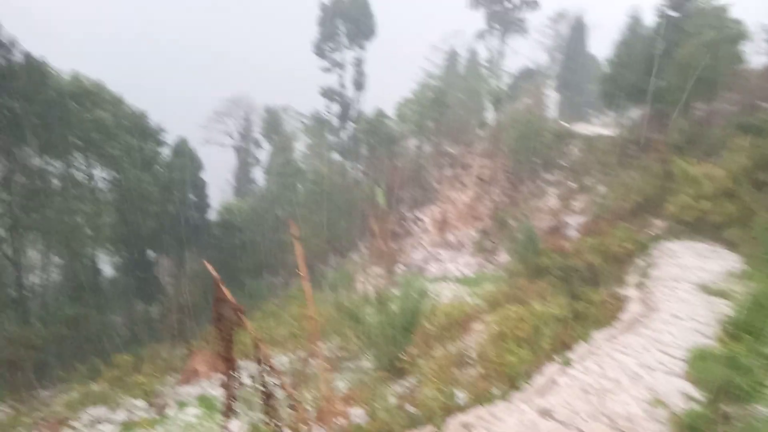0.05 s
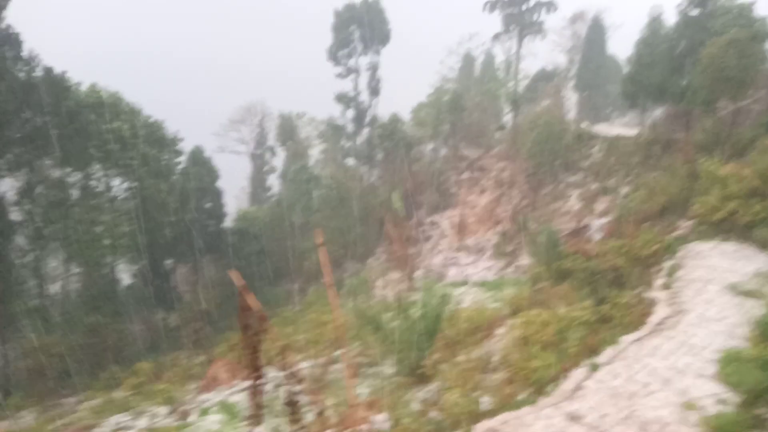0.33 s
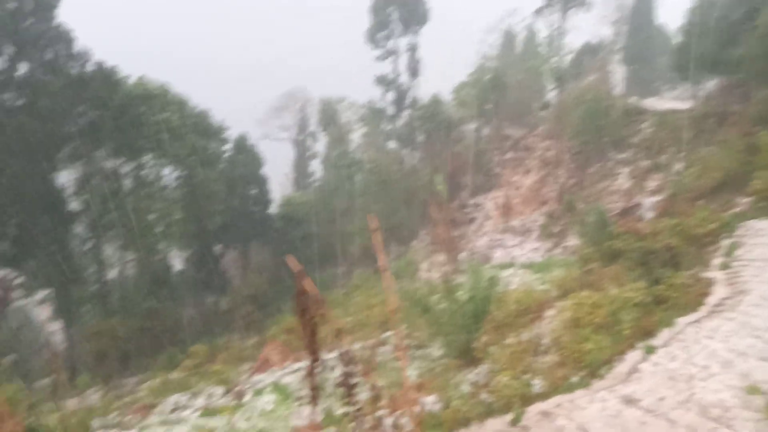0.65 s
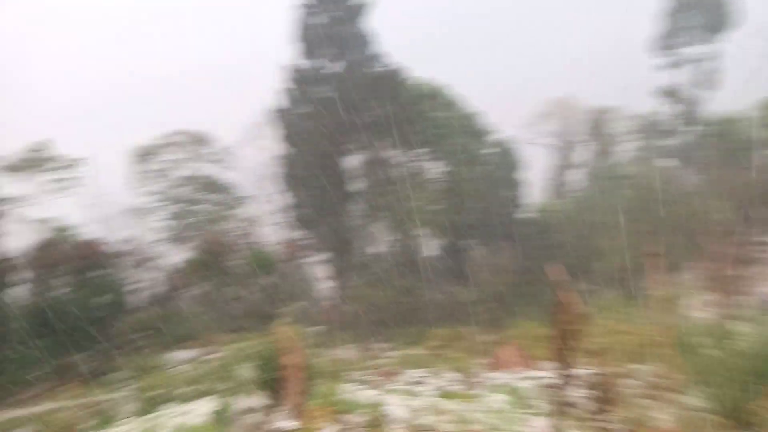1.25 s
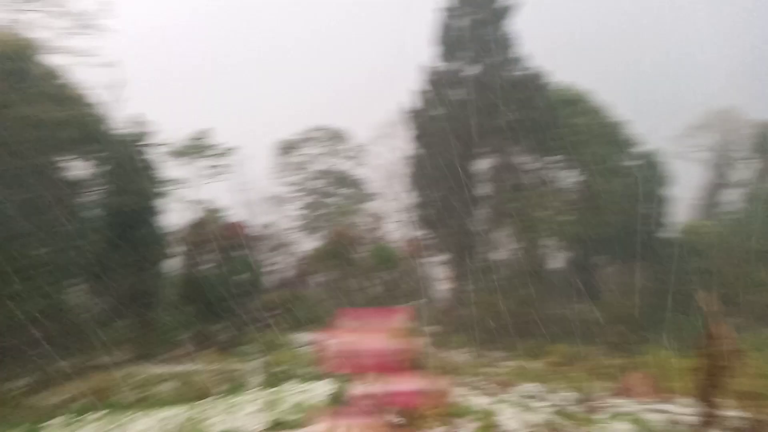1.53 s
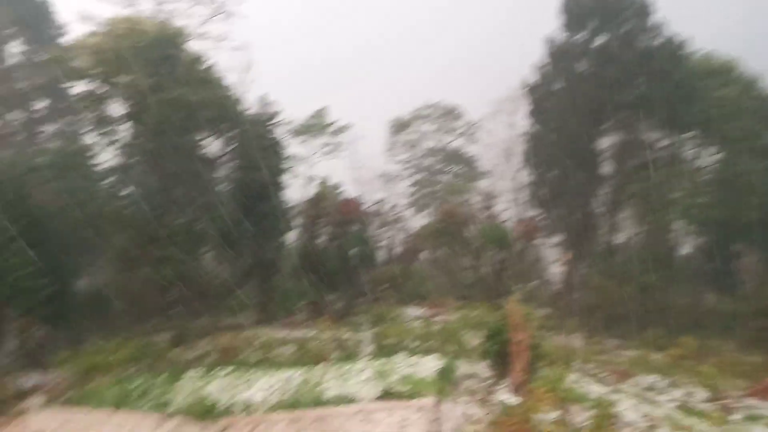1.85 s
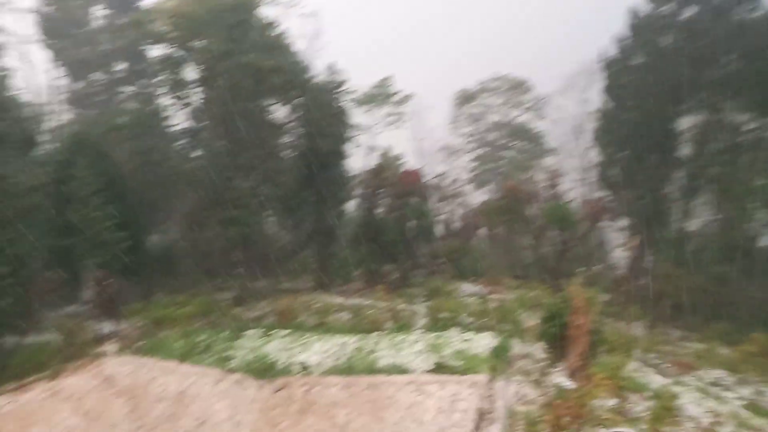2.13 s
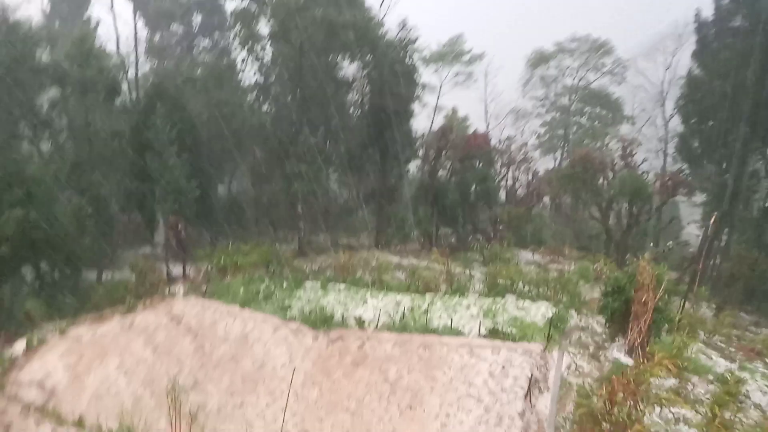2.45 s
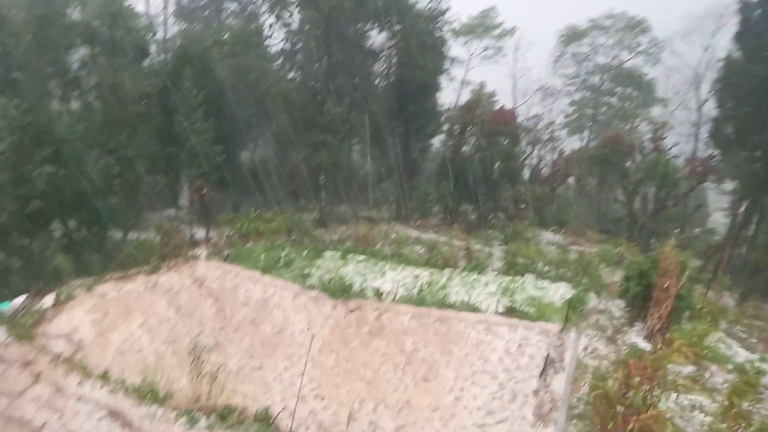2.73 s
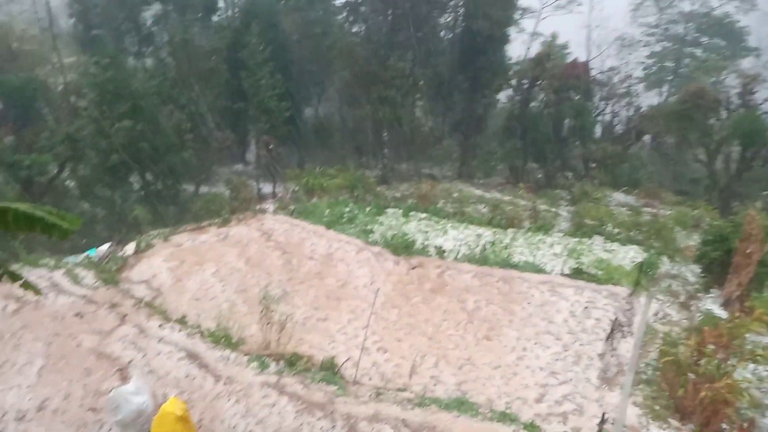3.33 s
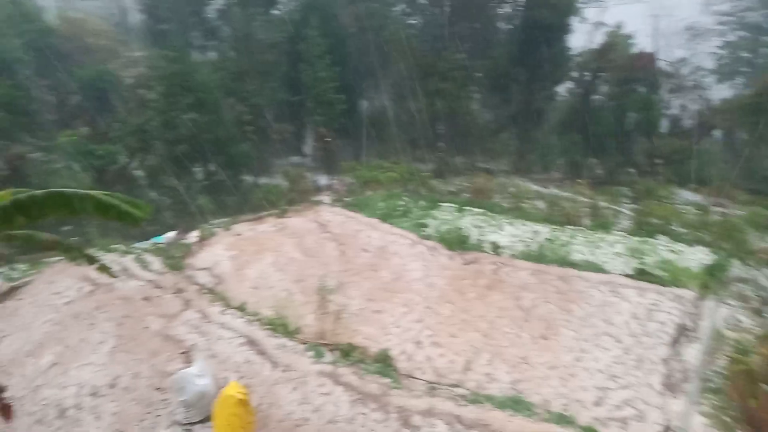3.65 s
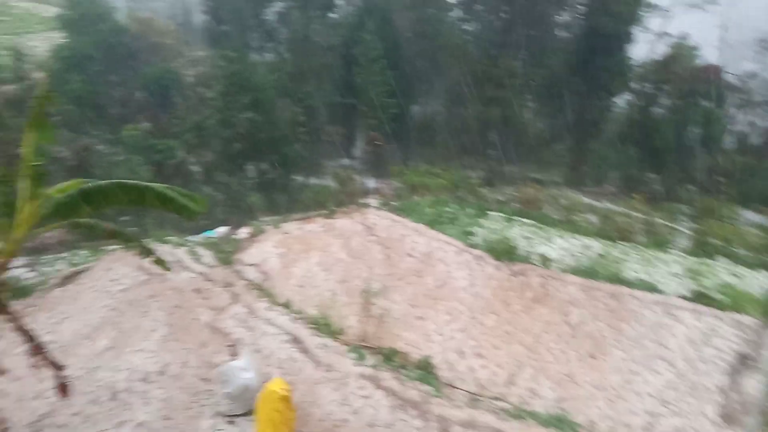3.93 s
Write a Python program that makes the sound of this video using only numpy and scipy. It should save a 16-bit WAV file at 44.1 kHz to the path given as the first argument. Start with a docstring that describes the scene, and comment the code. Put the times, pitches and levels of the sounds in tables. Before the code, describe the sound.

A hailstorm makes a dense roar and patter, with rapid, irregular knocks on roof sheets near the microphone and small icy ticks on the ground. Later the roar softens slightly as sharper blows stand out and a panel occasionally booms.

```python
"""Heavy hail outdoors, heard from beside a roof. From the start, countless far stones merge into a roar,
nearer ones patter, pellets tick on hard ground, and the biggest crack on the roofing: a short knock,
a rattle of the sheet, a dull answer from its frame. Early on, a few leave a loose sheet ringing;
from 1.5 s, heavy ones set a panel booming. After 2 s the roar eases back and the hardest blows land,
caught by a limiter."""
import sys
import numpy as np
from scipy import signal
from scipy.fft import rfft, irfft, next_fast_len
from scipy.io import wavfile
from scipy.ndimage import uniform_filter1d, minimum_filter1d, map_coordinates

SR = 44100
rng = np.random.default_rng(int(sys.argv[2]) if len(sys.argv) > 2 else 0)


def transcribe(u):
    """Save the signal u as a 16-bit wav file named by the first command-line argument.

    u: samples, shape (n,) or (channels, n), limited to [-1, 1]; the rate is SR.
    q: integer samples, one column per channel.
    """
    v = np.clip(np.atleast_2d(u).T, -1, 1)
    q = np.round(v * 32767).astype(np.int16)
    wavfile.write(sys.argv[1], SR, q)


N = 176400

# big stones on the roof: t/s, knock level/dB, knock f/Hz, rattle level/dB, bright rattle level/dB,
# frame level/dB, rattle t60/s
BIG_STONES = [(0.0034, -1, 2190, -18, -12.5, -24, 0.068), (0.0685, -11, 1910, -29, -18.5, -19, 0.21),
              (0.164, -11, 2300, -22, -19, -14, 0.28), (0.232, 1, 2140, -16.5, -21.5, -17, 0.3),
              (0.2852, -7, 1890, -18, -19, -23, 0.093), (0.414, -4, 3340, -15, -15, -17, 0.14),
              (0.4904, 0, 1710, -13, -23, -28, 0.062), (0.5745, -1.5, 1600, -16, -18.5, -19, 0.14),
              (0.7027, -2.5, 1870, -24, -20, -31, 0.07), (0.7345, -3, 1800, -23, -17, -42, 0.086),
              (0.944, -5, 1530, -28, -16, -15, 0.14), (1.0107, -8, 1740, -13, -14.5, -24, 0.16),
              (1.0281, 2.5, 1720, -11.5, -12.5, -32, 0.083), (1.0695, 0, 1590, -9, -13, -26, 0.1),
              (1.0947, 0, 1720, -14, -19, -19, 0.11), (1.128, -1, 1610, -13, -16, -34, 0.11),
              (1.1465, -4, 2270, -11, -20, -39, 0.06), (1.183, -4, 3280, -20, -13.5, -22, 0.12),
              (1.236, -1, 2000, -16, -18, -16.5, 0.096), (1.3503, -10, 1620, -18, -17, -20, 0.1),
              (1.425, -10, 2380, -17.5, -16.5, -18, 0.13), (1.4514, -7, 2560, -12, -10, -15, 0.084),
              (1.4946, -6, 1910, -7.5, -15, -16, 0.11), (1.512, 1, 1900, -12.5, -24, -18, 0.18),
              (1.536, -2, 2310, -6.5, -12, -17, 0.098), (1.598, -1, 3290, -14, -8.5, -44, 0.047),
              (1.702, -5, 2520, -8, -18, -18, 0.093), (1.779, 4, 1730, -12.5, -25, -26, 0.16),
              (1.8482, -5, 2030, -11.5, -12.5, -44, 0.11), (1.866, -2, 1890, -14, -23, -15, 0.21),
              (1.914, -9, 1980, -12, -14.5, -16, 0.077), (1.943, -1, 1930, -7, -13.5, -29, 0.09),
              (1.975, 0.5, 1810, -15, -19, -39, 0.098), (2.0547, -5, 1810, -11, -39, -17.5, 0.07),
              (2.0857, -5, 2540, -11, -19.5, -13, 0.28), (2.1321, 3.5, 1840, -9, -21, -14, 0.11),
              (2.1667, 1.5, 1700, -16, -17.5, -40, 0.065), (2.1991, 6, 2360, -10.5, -13.5, -28, 0.095),
              (2.2488, 6, 2320, -14.5, -18, -20, 0.13), (2.269, 2, 1840, -17, -22, -22, 0.28),
              (2.3516, 13, 2150, -13.5, -20.5, -20, 0.16), (2.4624, -1.5, 1480, -7, -18.5, -42, 0.057),
              (2.4998, 2, 1890, -15, -24, -20, 0.16), (2.5588, -5, 2260, -20, -20.5, -24, 0.27),
              (2.604, -0.5, 2120, -12, -23, -19.5, 0.098), (2.6508, -3, 2240, -6.5, -26, -20.5, 0.07),
              (2.785, -9, 2070, -10, -30, -22, 0.05), (2.8002, 6, 2350, -12.5, -25, -19.5, 0.22),
              (2.8894, -0.5, 2010, -14.5, -14, -15.5, 0.095), (2.923, -4, 1560, -16, -29, -24, 0.11),
              (2.988, -1, 2180, -12.5, -27, -19, 0.14), (3.0194, -2, 1800, -7, -10, -17, 0.064),
              (3.0703, -3, 2440, -18, -36, -37, 0.043), (3.0917, 6, 2350, -14, -23, -22.5, 0.16),
              (3.1283, -3, 2040, -10, -16, -20.5, 0.081), (3.1637, -4, 2180, -18, -19, -27, 0.13),
              (3.1815, -0.5, 1730, -10, -18, -20.5, 0.11), (3.2262, -2, 2040, -9.5, -12.5, -18, 0.12),
              (3.3053, 4, 2210, -18, -29, -43, 0.24), (3.3337, -6, 2150, -11, -16, -24, 0.08),
              (3.3924, 8, 2170, -8, -16, -18, 0.078), (3.429, -8, 1930, -13.5, -21.5, -17, 0.13),
              (3.472, -8.5, 2150, -26, -22, -35, 0.082), (3.5087, -7.5, 2250, -12, -27, -24, 0.13),
              (3.523, -3.5, 2000, -12.5, -18.5, -21.5, 0.12), (3.5518, -6.5, 2310, -15.5, -17, -25, 0.13),
              (3.6162, 1, 2140, -12, -15, -20, 0.068), (3.6538, 0.5, 2405, -11, -16, -25, 0.08),
              (3.677, -4, 2250, -11, -19.5, -18.5, 0.1), (3.743, -11.5, 1840, -16, -23, -19.5, 0.093),
              (3.824, -5, 2480, -12, -11.5, -18, 0.11), (3.8788, -9, 1890, -13.5, -19, -19, 0.17),
              (3.954, -5, 2500, -10.5, -25, -26, 0.07), (3.9815, -5, 1980, -3, -16, -22.5, 0.048)]
# tone colour of hail clattering on roofs: f/Hz, level/dB
CLATTER_COLOUR = [(500, -21), (1100, -6.5), (1850, 1), (2900, -4.5), (3800, -3.5), (4400, -11.5),
                  (5500, -27.5), (8000, -54)]


def amp(db):
    """Decibels to gain."""
    return 10 ** (np.asarray(db) / 20)


def unit(x):
    """Scale to rms 1."""
    return x / np.sqrt(np.mean(x ** 2) + 1e-20)


def wobble(knots_per_s):
    """A smooth random curve."""
    return map_coordinates(rng.standard_normal(4096), [np.arange(N) * knots_per_s / SR], mode="wrap")


def coloured(x, colour):
    """x through a causal EQ curve (f/Hz, level/dB), at rms 1."""
    size = 2 * next_fast_len(len(x) // 2 + 2048)
    hz, db = np.transpose(colour)
    curve_db = np.interp(np.log(np.fft.rfftfreq(size, 1 / SR) + 1), np.log(hz), db)
    cepstrum = irfft(np.log(amp(curve_db)))
    cepstrum[1:size // 2] *= 2  # minimum phase: nothing rings ahead of an attack
    cepstrum[size // 2 + 1:] = 0
    response = np.exp(rfft(cepstrum))
    return unit(irfft(rfft(x, size) * response)[:len(x)])


def noise(colour):
    """Fresh noise of the given colour."""
    return coloured(rng.standard_normal(N), colour)


def click(colour):
    """One impulse of the given colour, shifted a little in pitch, with peak 1."""
    shift = np.exp(0.11 * rng.standard_normal())
    pulse = coloured(signal.unit_impulse(SR // 100), np.array(colour) * [shift, 1])
    return pulse / np.abs(pulse).max()


def fade(t, rise_s, t60_s):
    """Quick attack, exponential decay."""
    return (1 - np.exp(-t / rise_s)) * amp(-60 * t / t60_s)


def sines(hz, db, t):
    """A sum of modes at the given pitches and levels."""
    return amp(db) @ np.sin(2 * np.pi * np.outer(hz, t))


def add(out, at, sound):
    """Mix a sound in, starting at the given second."""
    i = max(0, round(at * SR))
    out[i:i + len(sound)] += sound[:max(0, N - i)]


def bursts(times, levels_db, shapes):
    """The joint envelope of overlapping blows, added in power; one shape for all or one each."""
    power = np.zeros(N)
    for at, envelope in zip(times, amp(levels_db)[:, None] * shapes):
        add(power, at, envelope ** 2)
    return np.sqrt(power)


def shower(per_s, spread_db):
    """Impulses at random moments, of widely scattered size."""
    lands = rng.random(N) < per_s / SR
    size = np.minimum(rng.standard_normal(N), 2)
    sign = rng.choice([-1, 1], N)
    return lands * sign * amp(spread_db * size)


def bed_levels():
    """Fader curves in dB for the body, clatter and hiss of the background, with brief dips."""
    # swell and ebb of the far hail: t/s, body level/dB, clatter level/dB, hiss level/dB
    swells = [(0.0, -23, -15.5, -40), (0.56, -24, -17, -39.5), (0.87, -23.5, -17.5, -39.5),
              (1.05, -20.5, -18, -39), (1.17, -21, -15, -37), (1.49, -28, -17, -40.5),
              (1.68, -21.5, -17, -41.5), (1.97, -25, -17.5, -43.5), (2.29, -29, -24, -46.5),
              (2.6, -28, -21.5, -44.5), (3.07, -26, -19, -43.5), (3.24, -27.5, -20.5, -46),
              (3.71, -30, -22, -46), (4.0, -29, -23, -45.5)]
    # the level dips briefly: t/s, depth/dB
    lulls = [(.36, 3.5), (1.585, 3), (2.238, 3), (2.338, 3), (2.425, 1), (2.762, 4), (3.384, 9)]
    t, lull_s = np.arange(N) / SR, 0.0083
    dip_db = sum(depth * np.exp(-((t - at) / lull_s) ** 2) for at, depth in lulls)
    times, *faders = np.transpose(swells)
    return [np.interp(t, times, db) - dip_db for db in faders]


def roar():
    """Far stones: a dull body, the clatter of many roofs, and hiss from leaves and ground."""
    # low body of the roar: f/Hz, level/dB
    body_colour = [(20, -47), (35, -51), (60, -18.5), (95, -3), (140, -6), (195, -2.5), (250, -2), (315, 3),
                   (430, -0.5), (620, 0), (800, -.5), (1100, -4), (1700, -13), (4000, -51)]
    # hiss of hail on leaves and ground: f/Hz, level/dB
    hiss_colour = [(3500, -18), (5200, -7.5), (6700, -1), (8000, -15), (9800, -24.5), (11400, -23),
                   (12400, -29), (13500, -25), (14300, -26), (15500, -24)]
    body_trim_db, clatter_trim_db, hiss_trim_db = -1, -4, -4.5
    body_db, clatter_db, hiss_db = bed_levels()
    flurry_db = 0.64 * wobble(knots_per_s=35.18)
    flutter_db = 2.0 * wobble(knots_per_s=50)
    body = amp(body_trim_db + body_db + flurry_db + flutter_db) * noise(body_colour)
    clatter = amp(clatter_trim_db + clatter_db + flurry_db) * noise(CLATTER_COLOUR)
    hiss = amp(hiss_trim_db + hiss_db + 0.7 * flurry_db) * noise(hiss_colour)
    return body + clatter + hiss


def patter():
    """Middling stones on the roof, each a tap with a brief rattle, and fine grit on the ground."""
    # sizzle of fine grit: f/Hz, level/dB
    grit_colour = [(3500, -26), (5500, -8), (6800, 10), (8300, 1), (10000, -10), (11400, -4), (12400, -9),
                   (13500, -5), (15500, -14)]
    roof_trim_db, grit_trim_db, rattle_t60_s = -8, -18.5, 0.033
    _, clatter_db, hiss_db = bed_levels()
    t = np.arange(SR // 8) / SR
    taps = shower(per_s=260, spread_db=8)
    rattle_power = signal.fftconvolve(taps ** 2, amp(-60 * t / rattle_t60_s) ** 2)[:N]
    rattle = np.sqrt(np.abs(rattle_power)) * rng.standard_normal(N)
    roof = coloured(unit(taps) + unit(rattle), CLATTER_COLOUR)
    grit = coloured(shower(per_s=150, spread_db=10), grit_colour)
    return amp(roof_trim_db + clatter_db) * roof + amp(grit_trim_db + hiss_db) * grit


def ticks():
    """A pellet clicks on hard ground, splinters an instant later and scatters its crumbs."""
    # pellets landing close by: t/s, level/dB, extra level of the ring/dB
    pellets = [(0.0959, -23.5, 4), (0.5368, -22.5, -1.5), (0.5683, -27, -4), (0.8694, -30, -7),
               (0.9532, -24, 5), (1.0725, -31, -5), (1.1097, -30, -4), (1.2166, -32, 0), (1.2361, -31, -3),
               (1.2446, -28, -8), (1.916, -35, 3), (2.0218, -40, 3), (2.0698, -33, -1), (2.1171, -30, -13),
               (2.256, -34, -7), (2.278, -29, -4), (2.2903, -31, 1), (2.5385, -39, -8), (2.597, -34.5, 0),
               (2.611, -35, 2), (2.9238, -37, 3), (3.089, -41, -6), (3.16, -42, -8), (3.2281, -40, 5),
               (3.302, -38, -8), (3.3615, -34, -1), (3.4575, -39, -8), (3.5299, -35, -9),
               (3.6037, -39, -11), (3.8247, -40, 0), (3.8784, -36, -3), (3.927, -38.5, 1)]
    # glassy ring of a pellet: f/Hz, level/dB
    ring_colour = [(4000, -29), (5800, 8), (6700, 19), (8000, -43), (10000, -29)]
    # splintering ice: f/Hz, level/dB
    splinter_colour = [(4000, -10), (7000, 4.5), (9500, -8.5), (11400, -13), (12400, 1), (13500, -13),
                       (16000, -7)]
    ring_trim_db, crumbs_db, snap_db, splinter_delay_s = 0.5, -4, 7, 0.0018
    tick_t60_s, tail_db, tail_t60_s = 0.0062, -11, 0.09
    t = np.arange(SR // 8) / SR
    times, levels_db, rings_db = np.transpose(pellets)
    decay = amp(-60 * t / tick_t60_s) + amp(tail_db - 60 * t / tail_t60_s)
    ring = bursts(times, levels_db + rings_db + ring_trim_db, decay) * noise(ring_colour)
    crumbs = bursts(times + splinter_delay_s, levels_db + crumbs_db, decay) * noise(splinter_colour)
    out = ring + crumbs
    for at, db, ring_db in pellets:
        add(out, at, amp(db + ring_db) * click(ring_colour))
        add(out, at + splinter_delay_s, amp(db + snap_db) * click(splinter_colour))
    return out


def panel_booms():
    """A heavy stone sets a whole panel swinging; where it lands decides how deep or hollow it sounds."""
    # heavy stones on a panel: t/s, deep level/dB, hollow level/dB, hollow f/Hz
    heavy_stones = [(1.535, -20.5, -19, 417), (2.621, -25.5, -19, 415), (3.119, -24, -12, 437),
                    (3.222, -35, -21, 450), (3.426, -18, -17.5, 401), (3.684, -27.5, -18.5, 411)]
    # low panel modes: f/Hz, level/dB, blend (0 follows the deep level, 1 the hollow level)
    deep_modes = [(102.3, -1, 0), (191, -4.5, .2), (305.7, -3.5, 0.28)]
    # upper panel modes: multiple of the hollow pitch, level/dB
    hollow_modes = [(1, -0.5), (1.2, -5), (1.7, -6)]
    out, t = np.zeros(N), np.arange(SR // 3) / SR
    hz, low_db, blend = np.transpose(deep_modes)
    ratio, upper_db = np.transpose(hollow_modes)
    for at, deep_db, hollow_db, hollow_hz in heavy_stones:
        detuned_hz = hz * (1 + 0.03 * rng.standard_normal(len(hz)))
        deep = sines(detuned_hz, low_db + deep_db + blend * (hollow_db - deep_db), t)
        hollow = sines(hollow_hz * ratio, upper_db + hollow_db, t)
        add(out, at, (deep + hollow) * fade(t, rise_s=0.0064, t60_s=0.15))
    return out


def sheet_rings():
    """A loose sheet rings on after the blow, in two close modes that beat."""
    # stones on a loose sheet: t/s, level/dB, f/Hz, t60/s
    hits = [(0.231, -16, 2023, 0.14), (0.418, -16, 3600, 0.065), (1.071, -9.5, 1426, 0.083),
            (1.078, -12, 1710, .11), (1.2356, -15, 1900, 0.05), (1.537, -6, 3520, 0.03),
            (1.602, -6, 2490, 0.033)]
    # the beating pair: multiple of the pitch, level/dB
    sheet_modes = [(1.002, 2), (1.053, -2.5)]
    out, t = np.zeros(N), np.arange(SR // 5) / SR
    ratio, mode_db = np.transpose(sheet_modes)
    for at, db, hz, t60 in hits:
        add(out, at, sines(hz * ratio, db + mode_db, t) * fade(t, rise_s=0.0011, t60_s=t60))
    return out


def roof_rattle():
    """After each knock the sheet rattles and its frame answers."""
    # midrange rattle of the sheet: f/Hz, level/dB
    rattle_colour = [(500, -34), (1100, -15.5), (1600, 1), (2050, 4), (2500, 1.5), (3100, -12), (4500, -52)]
    # bright edge of the rattle: f/Hz, level/dB
    bright_colour = [(1800, -32), (2700, -2), (3700, 2), (4300, -2.5), (5400, -19.5), (6800, -22.5),
                     (9000, -46), (15000, -56)]
    # dull thud of the frame: f/Hz, level/dB
    frame_colour = [(30, -37), (90, -8), (180, -7), (350, -0.5), (700, -2), (1100, -4), (2000, -19),
                    (4000, -51)]
    t = np.arange(SR // 3) / SR
    times, _, _, rattle_db, bright_db, frame_db, t60 = np.transpose(BIG_STONES)
    shaking = fade(t, rise_s=0.0033, t60_s=t60[:, None])
    rattle = bursts(times, rattle_db, shaking) * noise(rattle_colour)
    bright = bursts(times, bright_db, shaking) * noise(bright_colour)
    frame = bursts(times, frame_db, fade(t, rise_s=0.0041, t60_s=0.15)) * noise(frame_colour)
    return rattle + bright + frame


def knocks():
    """Each big stone cracks against the roof and briefly rings the spot that it hits."""
    # modes of the struck spot: multiple of the pitch, level/dB
    spot_modes = [(.74, -4.5), (1, 6), (1.199, -5), (1.65, -9.5)]
    # level and ring time of the knocks, longest at the start, lifted toward the end: t/s, level/dB, t60/s
    knock_shape = [(0, -7.5, 0.013), (2.1, -5.5, 0.0079), (2.2, -10, 0.0088), (4, 0, 0.011)]
    # crack of ice on roofing: f/Hz, level/dB
    crack_colour = [(700, -19), (1500, -9), (2400, 8), (3900, 0), (5200, -33), (9000, -60)]
    detune_spread, scatter_db, crack_db, lowpass_hz = 0.025, 2.5, -4, 4600
    out, t = np.zeros(N), np.arange(SR // 20) / SR
    ratio, mode_db = np.transpose(spot_modes)
    shape_times, shape_db, shape_t60 = np.transpose(knock_shape)
    for at, db, hz, *_ in BIG_STONES:
        detune, scatter = rng.standard_normal((2, len(ratio)))
        modes = sines(hz * ratio * (1 + detune_spread * detune), mode_db + scatter_db * scatter, t)
        ring = modes * fade(t, rise_s=0.0008, t60_s=np.interp(at, shape_times, shape_t60))
        knock_db = db + np.interp(at, shape_times, shape_db)
        add(out, at, amp(knock_db) * ring / np.abs(ring).max())
        add(out, at, amp(knock_db + crack_db) * click(crack_colour))
    return signal.sosfilt(signal.butter(6, lowpass_hz, fs=SR, output="sos"), out)


def scene():
    """The bed of far and middling hail, the big hits on the roof and the close ticks, in mono."""
    bed = roar() + patter()
    roof_hits = knocks() + roof_rattle() + sheet_rings() + panel_booms()
    return (bed + roof_hits + ticks())[None]


def record(dry):
    """A low cut clears the deepest bass, a fast limiter catches the hardest blows, the very top is cut."""
    low_cut_hz, top_hz = 55, 15500
    ceiling_db, hold_s = -0.7, 0.002
    x = signal.sosfilt(signal.butter(3, low_cut_hz, btype="high", fs=SR, output="sos"), dry)
    hold = round(hold_s * SR)
    needed_gain = np.minimum(1, amp(ceiling_db) / (np.abs(x) + 1e-9))
    limited = x * uniform_filter1d(minimum_filter1d(needed_gain, 2 * hold), hold)
    size = next_fast_len(N + SR // 2)
    passband = np.fft.rfftfreq(size, 1 / SR) < top_hz
    return irfft(rfft(limited, size) * passband, size)[..., :N]


dry = scene()
out = record(dry)
transcribe(out)
```